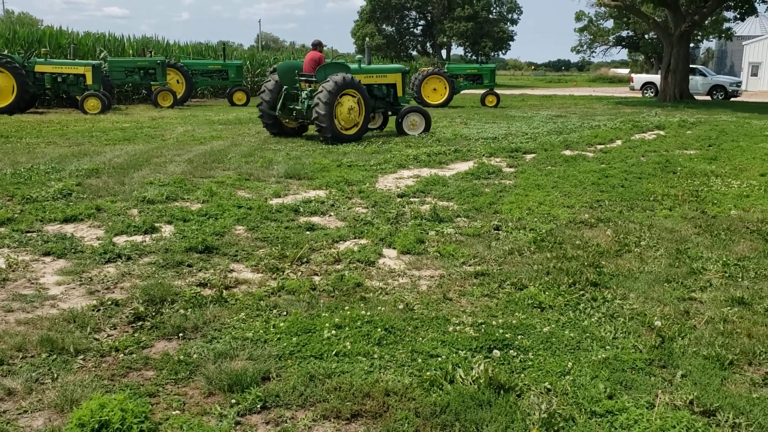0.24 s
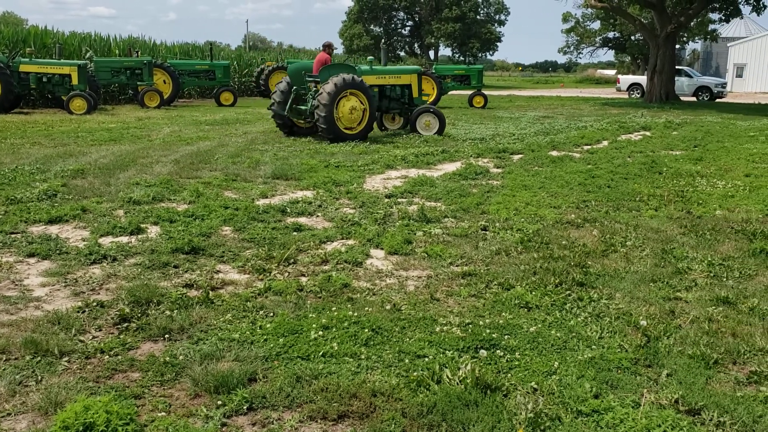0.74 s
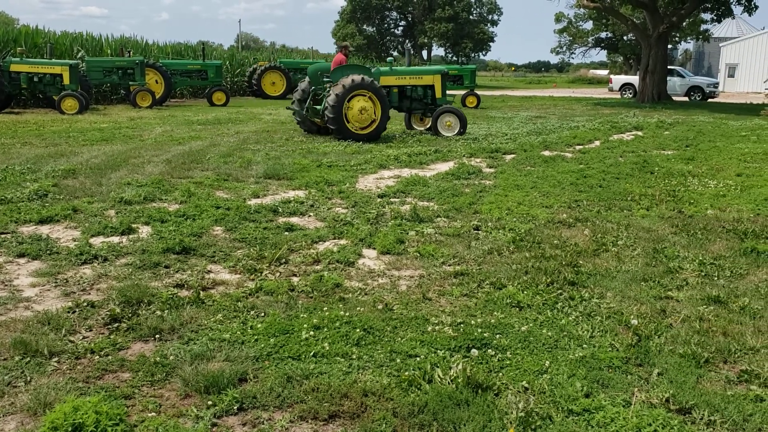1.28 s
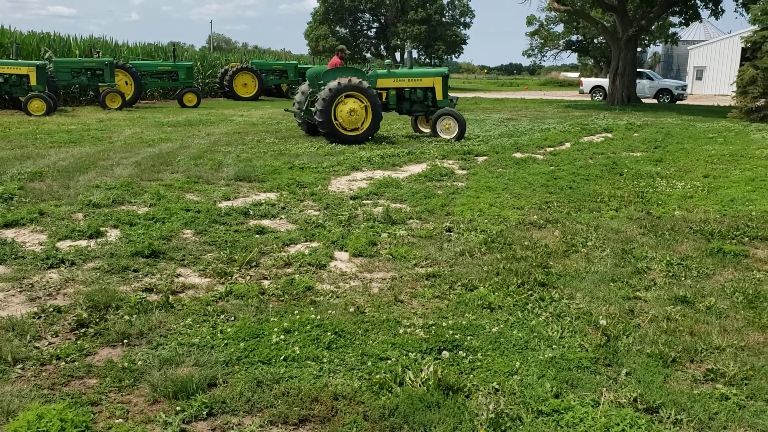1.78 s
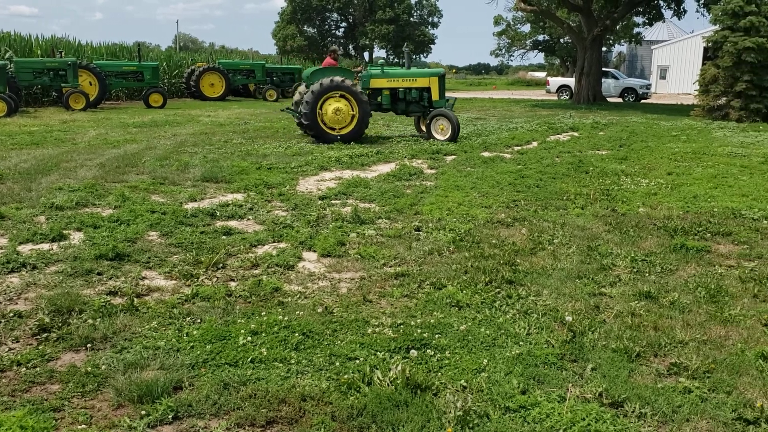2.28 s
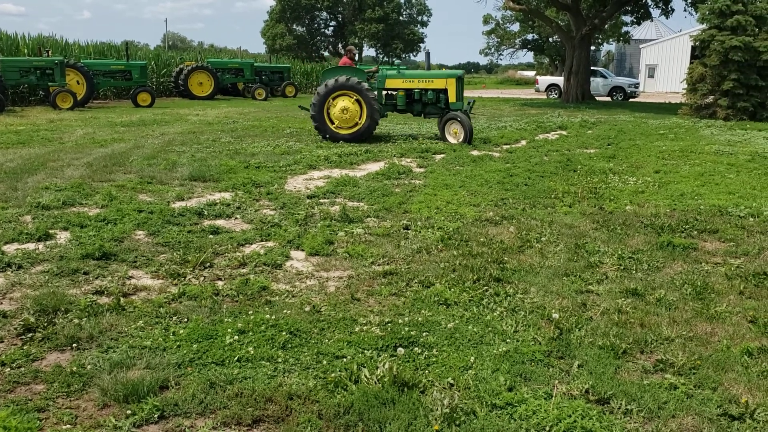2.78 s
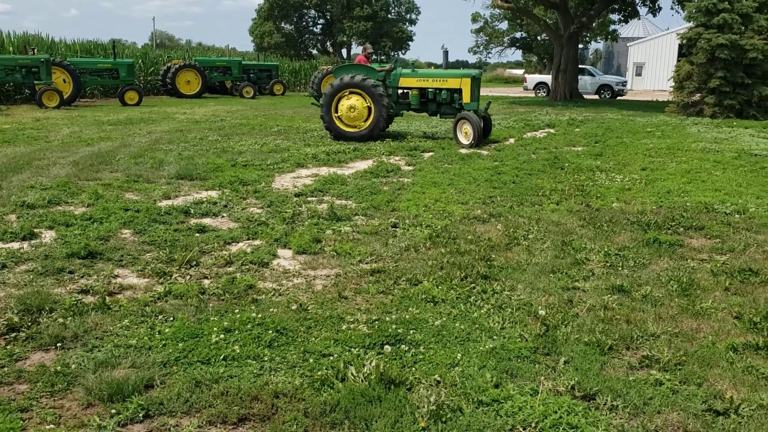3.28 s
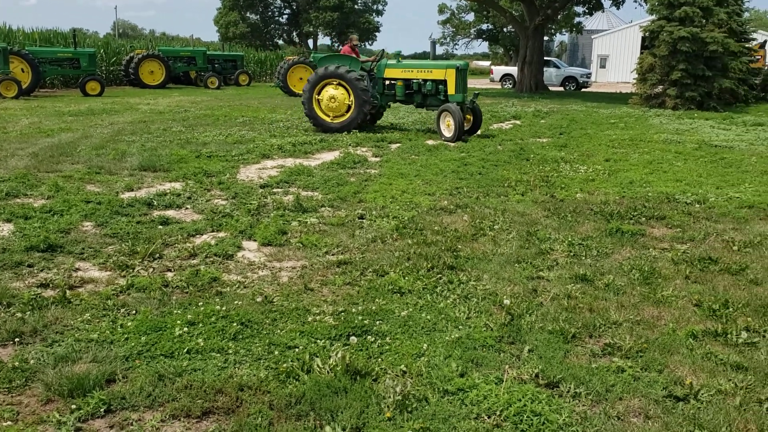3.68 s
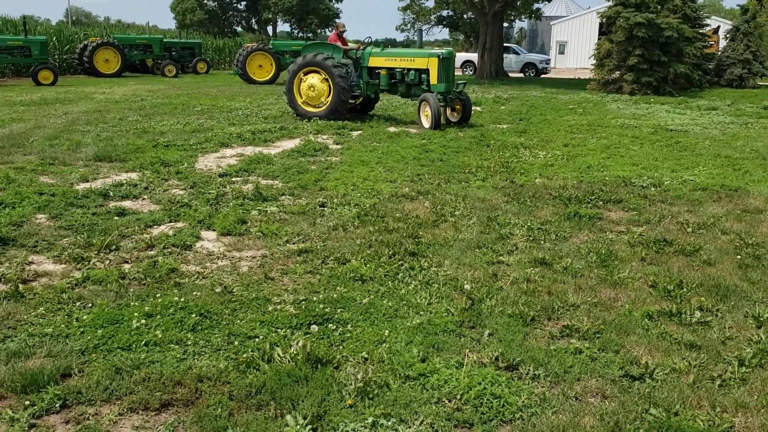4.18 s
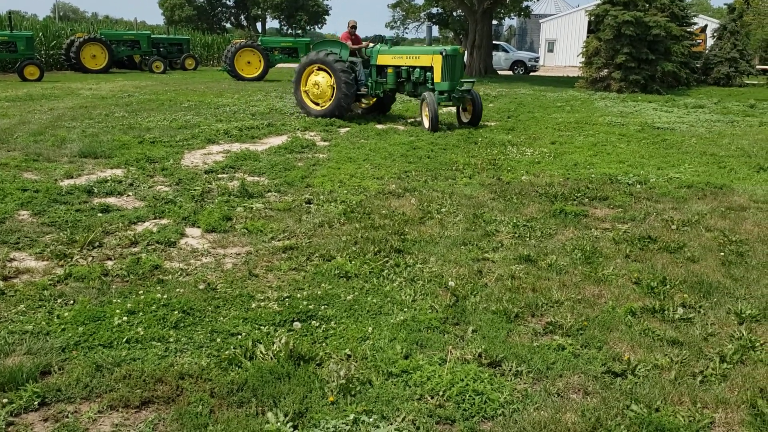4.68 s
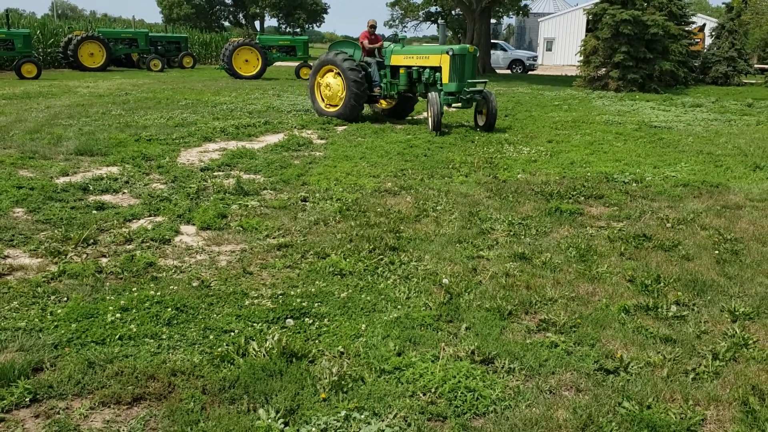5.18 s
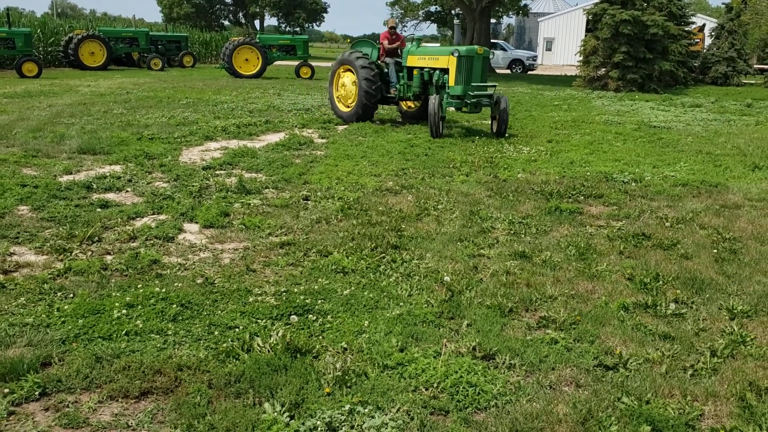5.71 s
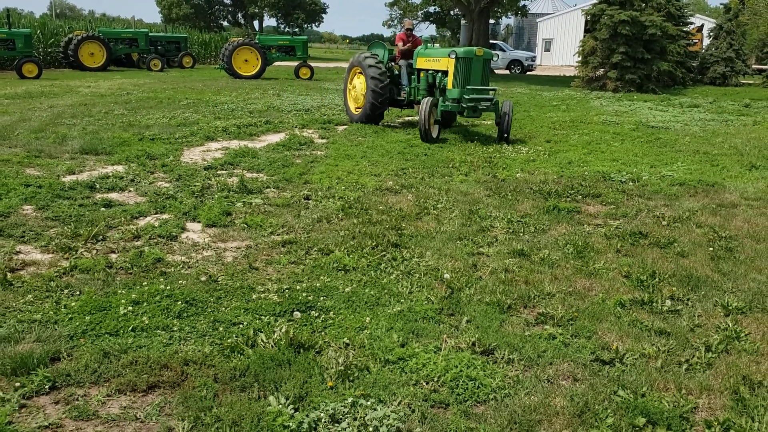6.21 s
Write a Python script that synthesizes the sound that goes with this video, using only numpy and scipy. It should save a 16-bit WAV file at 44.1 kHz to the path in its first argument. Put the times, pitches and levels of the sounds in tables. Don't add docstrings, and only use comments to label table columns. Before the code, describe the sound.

Steady throaty tractor engine outdoors, rapid low pulses with metallic rattle and airy rush growing brighter as it turns, another engine idling behind.

```python
import sys
import numpy as np
from scipy import signal
from scipy.fft import rfft, irfft
from scipy.io import wavfile
from scipy.ndimage import uniform_filter1d

SR = 44100
rng = np.random.default_rng(int(sys.argv[2]) if len(sys.argv) > 2 else 0)


def voltage_ratio(decibels):
    exponent = np.asarray(decibels, float) / 20
    return 10 ** exponent


def master(y):
    cut = np.clip(np.atleast_2d(y).T, -1, 1)
    pcm = np.round(cut * 32767)
    wavfile.write(sys.argv[1], SR, pcm.astype(np.int16))


N = 284445

# t/s, f/Hz
FIRING_RATE = [(0, 34.501), (.44, 35.089), (.75, 34.787), (1.36, 34.449), (1.55, 34.842), (1.78, 34.4),
               (2.44, 34.421), (2.62, 34.531), (3.04, 35.011), (3.63, 34.652), (3.89, 34.373),
               (4.28, 35.27), (4.46, 35.562), (4.68, 34.761), (5.21, 35.74), (5.47, 34.567), (5.77, 35.046),
               (6.45, 34.988)]
# multiple of firing rate, level/dB rms
EXHAUST = [(1, -49), (2, -31), (3, -37.5), (4, -32), (8, -53)]
# t/s, level/dB
PIPE = [(0, -35.5), (.44, -33), (.9, -28), (1.36, -29.5), (1.7, -31.5), (2.2, -33), (2.7, -26),
        (3.04, -29.3), (3.5, -28), (3.8, -31), (4.1, -27), (4.68, -29.5), (5.21, -25.5), (5.47, -29),
        (5.77, -27), (6.45, -26)]
# f/Hz, t60/s, first cylinder level/dB, second level/dB
KNOCK = [(1092, 0.089, -7.5, -3), (1610, .012, 0.5, -8), (596.5, 0.1, -15, -13.5), (1237, 0.027, -2, -1),
         (1370, 0.03, 2.5, 0), (1855, 0.017, 1.5, 1.5), (2527, 0.022, -3.5, -6), (2930, 0.019, -15, -3),
         (3380, 0.023, -8.5, -11), (4480, 0.044, -11.5, -17.5), (4970, 0.026, -21, -11.5)]
# t/s, share of its pitch
PANEL = [(0, 1.01), (1.5, 1.01), (1.8, .99), (2.5, .975), (3.2, .958), (3.7, 1), (4.2, .955), (4.6, .99),
         (5, 1.015), (5.3, 1), (5.8, .988), (6.45, 1.03)]
# t/s, looseness 0-1
LOOSE = [(0, 0.51), (.6, 0), (1.5, 0.2), (1.9, 0.77), (2.5, 0.82), (3.1, 0.8), (3.6, 0.25), (4.1, .1),
         (4.35, 0.8), (4.8, 0.74), (5.1, .5), (5.7, 0.85), (6.1, 0.35), (6.45, .5)]
# f/Hz, width/Hz, level/dB
MANIFOLD = [(616, 273, -2.5), (818, 253, -3.5)]
# f/Hz, width/Hz, level/dB
BLOCK = [(1088, 129, -1), (1337, 220, -2)]
# f/Hz, width/Hz, level/dB
BLOWER = [(1783, 277, 0.5), (2595, 392, -7.5), (3005, 190, -6), (3330, 160, -11), (4460, 960, -14.5),
          (6870, 1310, -26)]
# f/Hz, width/Hz, level/dB
HISS = [(9300, 900, -15), (11560, 2500, 8), (15600, 1900, 2.5)]
# f/Hz, width/Hz, level/dB
VALVE = [(6270, 1500, 0)]
# t/s, peak level/dB
STRAYS = [(1.1164, -43), (2.0259, -45), (2.2324, -45), (2.4229, -43), (2.589, -42), (2.6745, -47),
          (2.8716, -39), (3.192, -48), (3.3218, -45), (3.7387, -47), (4.6713, -46), (5.3912, -44),
          (5.6508, -46), (5.7371, -51)]
# t/s, peak level/dB
CLINKS = [
    (1.062, -42),
    (1.2347, -40),
    (1.3828, -37),
    (2.2794, -42),
    (4.128, -39),
    (4.6689, -42),
    (5.719, -38),
    (6.0902, -41),
    (6.3768, -44),
]
# f/Hz, width/Hz, level/dB
LINKS = [(4400, 790, -1), (5000, 340, 5)]
# t/s, firing rate f/Hz, level/dB
IDLER = [(0.0, 21.308, -30.5), (0.496, 21.207, -30), (0.992, 21.193, -30.5), (1.488, 21.342, -31),
         (1.985, 21.399, -32.5), (2.481, 21.44, -31), (2.977, 21.447, -30), (3.473, 21.417, -30),
         (3.969, 21.389, -31.5), (4.465, 21.487, -29.5), (4.962, 21.557, -29), (5.458, 21.529, -29),
         (5.954, 21.444, -30), (6.45, 21.551, -28.5)]
# multiple of firing rate, level/dB against the level above
IDLER_PIPE = [(2, -19), (3, -11), (4, -15.5), (5, -5), (6, -0.5), (7, -7), (8, -7.5), (9, -31)]
# f/Hz, t60/s, first beat level/dB, second beat level/dB
TAPPETS = [(1396, 0.025, -46, -28), (1865, 0.044, -55, -40), (5053, 0.053, -38.5, -45)]
# f/Hz, level/dB rms
YARD_HUM = [(30.9, -61), (55, -49), (62.42, -43), (66.27, -43), (73.3, -52), (119.5, -50), (122.1, -50),
            (146.65, -51), (196.2, -54)]
# f/Hz, level/dB per Hz
RUMBLE = [(22, -25), (32, -2), (60, 11), (140, 12), (210, 9), (280, 3), (360, -3.5), (480, -11),
          (900, -36.5)]
# f/Hz, level/dB
PORTS_DB = [(60, 1.2), (200, 2.6), (700, 4), (950, 2.5), (1300, 5.5), (2000, 12), (3000, 14.5), (3800, 1),
            (7500, 2), (9000, -6), (12000, -3), (15500, 8)]
# f/Hz, likeness 0-1
ALIKE = [(40, 0.8), (300, .98), (450, 0.91), (750, 1), (1200, 0.77), (1900, 0.37), (3000, 0.29),
         (8000, 0.053), (9000, 0.087)]

FIFTH_DB, FIFTH_RISE_DB_S, SIXTH_DB, SIXTH_TRADE, SEVENTH_DB = -32.5, 1.46, -33, 0.54, -46
HEADING_DEG, TURN_DEG_S = 55, 15.5
FLANK_DEG, NOSE_DEG = (69, 95), (108.5, 151.5)
# level/dB, gain with the flank/dB, gain with the nose/dB, gain with a loose bonnet/dB
MANIFOLD_DB, BLOCK_DB = (-44, 1.15, 3, -1.16), (-42.5, 1, 2, 1.5)
BLOWER_DB, HISS_DB = (-42, 2, -0.5, 0.65), (-68, 8.5, -.5, -0.2)
PANEL_DB, TOP_RINGS_DB = (-5, 0.4, 1, 7.5), (4.5, -1.5, -8, -1.7)
SEVENTH_GAIN_DB, TICK_DB = (.1, 6, -6.5, 0.5), (-52.5, 6.5, -1.5, 0.2)
# f/Hz, t60/s, first firing level/dB, second level/dB; then its part levels as above
INTAKE, INTAKE_DB = [(616, 0.036, -4, 0.1)], (-51.5, 6, 2, 7)
SCREENED_DB = (-0.4, -2, -4, 0.3)
TICK_AT_FIRING, TICK_SCATTER_DB = 1.8, 1.7
TOP_SAG_PER_DB, TOP_SAG = .014, .038
RUMBLE_DB, PORT_LAG_S, TOP_HZ = -35, .00018, 15730


def exhaust(firings, fifth_db):
    swing_db = fifth_db - FIFTH_DB - FIFTH_RISE_DB_S * np.arange(N) / SR
    sixth_db = SIXTH_DB - SIXTH_TRADE * swing_db
    seventh_db = SEVENTH_DB + facing(SEVENTH_GAIN_DB)
    orders = EXHAUST + [(5, fifth_db), (6, sixth_db), (7, seventh_db)]
    jittered = firings + .0025 * per_cycle(firings)
    return pulses(jittered, orders, -1.05) * voltage_ratio(.9 * per_cycle(firings))


def engine(firings):
    manifold_db, block_db = facing(MANIFOLD_DB), facing(BLOCK_DB)
    blower_db, hiss_db = facing(BLOWER_DB), facing(HISS_DB)
    manifold = surges(firings, 0.81, 0.11, 0.11, 2.3)
    block = surges(firings, 0.16, 0.13, 0.44, 1.5)
    blower = surges(firings, .17, .2, .3, 1.5)
    hiss = surges(firings, .85, .12, .6, 4) * voltage_ratio(1.6 * per_cycle(firings))
    hiss = level(hiss, -0.9)
    tick = ticks(valve_ticks(firings) + STRAYS, 0.0023)
    clink = ticks(CLINKS, 0.01)

    knock = strikes(firings, .175, KNOCK, 1.4, *curves(PANEL), facing(PANEL_DB), facing(TOP_RINGS_DB))
    paths = voltage_ratio(block_db + 5.0) * knock
    intake_flex = 1 + facing((0.0019, 0, .07, 0))
    paths += strikes(firings, .78, INTAKE, 9.5, intake_flex, facing(INTAKE_DB), np.zeros(N))
    for path, noise in zip(paths, rng.standard_normal((3, 5, N))):
        path += voltage_ratio(manifold_db - 0.86) * ring(manifold * noise[0], MANIFOLD)
        path += voltage_ratio(block_db - 1.5) * ring(block * noise[1], BLOCK)
        path += voltage_ratio(blower_db - 0.5) * ring(blower * noise[2], BLOWER)
        path += voltage_ratio(3.0) * tick * ring(noise[4], VALVE)
        path += voltage_ratio(-1.5) * clink * ring(noise[4], LINKS)
        path += ring(noise[3], HISS) * (voltage_ratio(hiss_db) * hiss + voltage_ratio(-2.0) * tick)
    return paths


def strikes(cycles, start, modes, scatter_db, flex, panel_db, top_db):
    when = np.interp(np.arange(int(cycles[-1])) + start, cycles, np.arange(N))
    first = when.astype(int)
    chance = rng.standard_normal((len(when), len(modes), 5))
    blow_db = 0.7 * rng.standard_normal(len(when))
    sag = 1 - np.clip(TOP_SAG_PER_DB * (top_db[0] - top_db), 0, TOP_SAG)
    paths = np.zeros((3, N + SR))
    for m, (hz, t60, *db) in enumerate(modes):
        facing_db = panel_db if m == 0 else top_db * ((hz > 4000) - 1.2 * (hz < 700))
        bend = flex if m == 0 else sag ** (hz > 4000)
        pitch = hz * (1 + 0.0059 * chance[:, m, 0]) * bend[first]
        mode_db = np.resize(db, len(when)) + scatter_db * hz / 3000 * chance[:, m, 1]
        size = voltage_ratio(mode_db + blow_db + facing_db[first])
        step = np.arange(int(.6 * t60 * SR))
        t = step / SR
        shape = (1 - np.exp(-t / 0.001)) * np.exp(-np.log(1000) * t / t60)
        spin = shape * np.exp(2j * np.pi * pitch[:, None] * t)
        for path, late in zip(paths, chance[:, m, 2:].T):
            lag = when % 1 / SR + .00004 * late
            blow = size * np.exp(-2j * np.pi * pitch * lag)
            sound = (spin * blow[:, None]).imag
            path += np.bincount((first[:, None] + step).ravel(), sound.ravel(), N + SR)
    return paths[:, :N]


def surges(firings, start, fall, depth, scatter_db):
    cycle = firings - start + 1
    size = voltage_ratio(scatter_db * rng.standard_normal(400))[cycle.astype(int)]
    surge = 1 + depth * size * np.exp(-(cycle % 1) / fall)
    return uniform_filter1d(surge, size=60) * voltage_ratio(0.52 * per_cycle(.45 * firings))


def valve_ticks(firings):
    at = np.interp(np.arange(TICK_AT_FIRING, firings[-1], 2), firings, np.arange(N))
    db = facing(TICK_DB)[at.astype(int)] + TICK_SCATTER_DB * rng.standard_normal(200)[:len(at)]
    return list(zip(at / SR, db))


def ticks(table, fall_s):
    hits = np.zeros(N)
    s, db = np.transpose(table)
    hits[(s * SR).astype(int)] = voltage_ratio(db)
    t = np.arange(1400) / SR
    shape = (1 - np.exp(-t / 0.0019)) ** 2 * np.exp(-t / fall_s)
    return signal.fftconvolve(hits, shape)[:N]


def facing(law):
    heading = HEADING_DEG + TURN_DEG_S * np.arange(N) / SR
    flank = np.interp(heading, FLANK_DEG, (0, 1))
    nose = np.interp(heading, NOSE_DEG, (0, 1))
    return law[0] + law[1] * flank + law[2] * nose + law[3] * curves(LOOSE)[0]


def idler():
    hz, db = curves(IDLER)
    firings = .666 + np.cumsum(hz) / SR
    drone = voltage_ratio(db) * pulses(firings, IDLER_PIPE, 2.74)
    _, left, right = strikes(firings, .1, TAPPETS, 1.84, np.ones(N), np.zeros(N), facing(SCREENED_DB))
    return drone, np.array([voltage_ratio(-13) * left, right])


def hum():
    t = np.arange(N) / SR
    tones = 0
    for k, (hz, db) in enumerate(YARD_HUM):
        waver = .4 * per_cycle(1.5 * t)
        tones = tones + np.sqrt(2) * voltage_ratio(db) * np.cos(2 * np.pi * hz * t + waver - 1 - k / 3)
    return tones


def yard():
    return level(irfft(rfft(rng.standard_normal(N)) * voltage_ratio(along(RUMBLE)), N), RUMBLE_DB)


def pulses(cycles, orders, skew):
    return sum(np.sqrt(2) * voltage_ratio(db) * np.cos(2 * np.pi * k * cycles + skew) for k, db in orders)


def per_cycle(cycles):
    return np.interp(cycles, np.arange(400), rng.standard_normal(400))


def ring(x, modes):
    out = 0
    for k, (hz, width, db) in enumerate(modes):
        b, a = signal.iirpeak(hz, hz / (1.89 * width), SR)
        twice = signal.lfilter(b, a, signal.lfilter(b, a, x))
        out = out + (-1) ** k * voltage_ratio(db) * twice
    return level(out, 0)


def level(x, db):
    return x * voltage_ratio(db) / np.sqrt(np.mean(x ** 2))


def curves(table):
    s, *columns = np.transpose(table)
    return [np.interp(np.arange(N) / SR, s, c) for c in columns]


def along(points):
    hz, value = np.transpose(points)
    return np.interp(np.log(np.arange(N // 2 + 1) * SR / N + 1), np.log(hz), value)


def ports(shared, left, right):
    alike = np.clip(along(ALIKE), 0, 1)
    hz = np.arange(N // 2 + 1) * SR / N
    lead = np.exp(1j * (.09 + np.pi * hz * PORT_LAG_S * np.clip(hz / 2200, 0, 1)))
    tilt = voltage_ratio(along(PORTS_DB) / 2)
    same, own = np.sqrt(alike) * rfft(shared), np.sqrt(1 - alike)
    left_port = tilt * (same * lead + own * rfft(left))
    right_port = (same / lead + own * rfft(right)) / tilt
    norm = 2 / np.sqrt(tilt ** 2 + tilt ** -2 + 2 * alike * np.cos(2 * np.angle(lead)))
    return irfft(norm * np.array([left_port, right_port]), N)


def scene():
    rate_hz, = curves(FIRING_RATE)
    fifth_db, = curves(PIPE)
    firings = .2025 + np.cumsum(rate_hz) / SR
    drone, tappets = idler()
    shared, left, right = engine(firings)
    shared = shared + exhaust(firings, fifth_db) + drone + hum() + yard()
    return ports(shared, left + yard(), right + yard()) + tappets


def top_cut(x):
    return signal.sosfilt(signal.butter(12, 16550, fs=SR, output="sos"), x)


def record(dry):
    low_pass = signal.ellip(12, .2, 70, TOP_HZ, fs=SR, output="sos")
    mix = signal.sosfilt(low_pass, dry)
    return top_cut(mix)


dry = scene()
out = record(dry)
master(out)
```